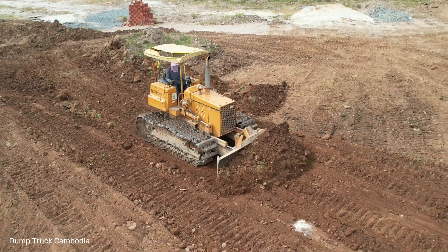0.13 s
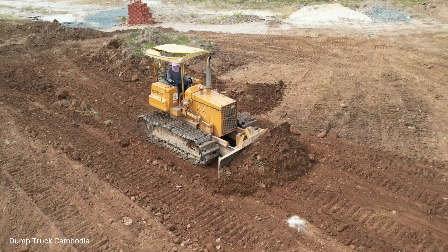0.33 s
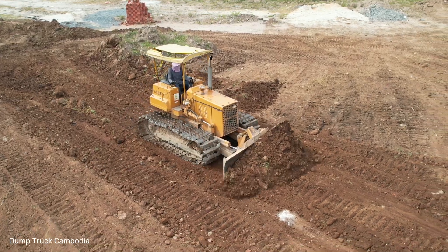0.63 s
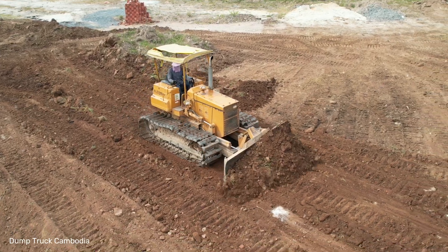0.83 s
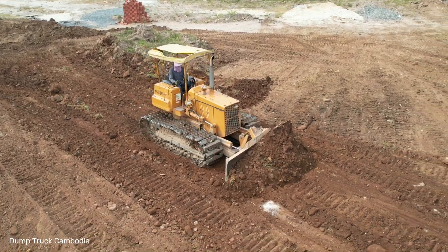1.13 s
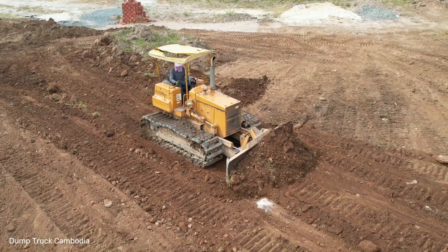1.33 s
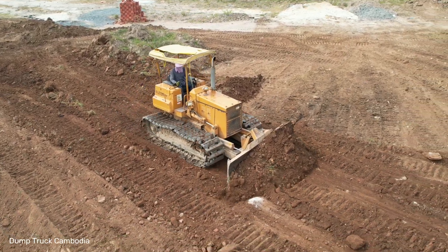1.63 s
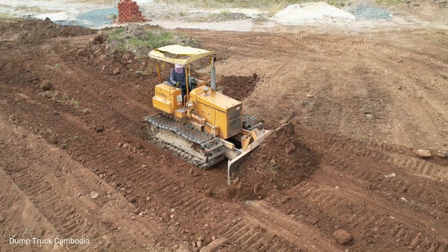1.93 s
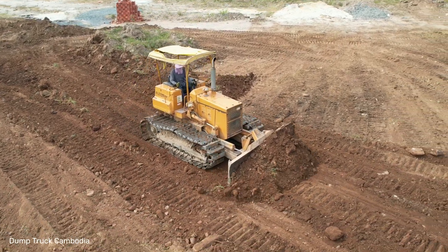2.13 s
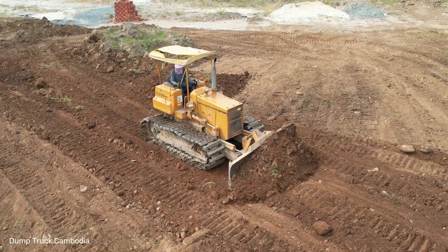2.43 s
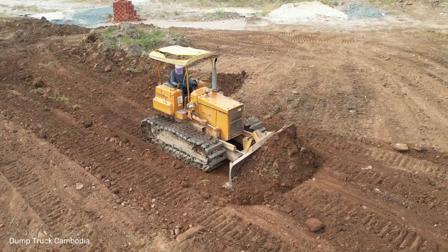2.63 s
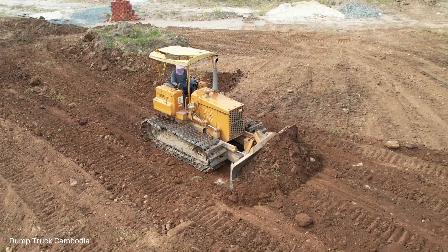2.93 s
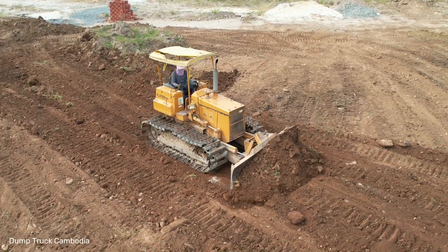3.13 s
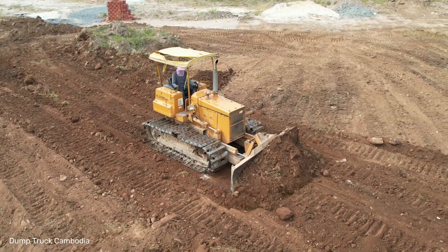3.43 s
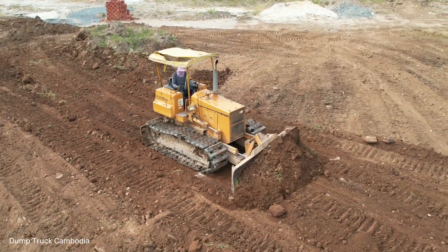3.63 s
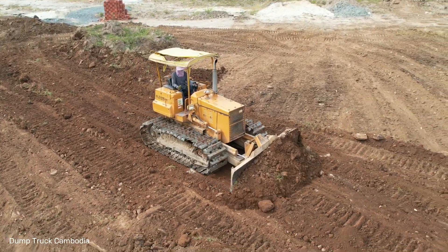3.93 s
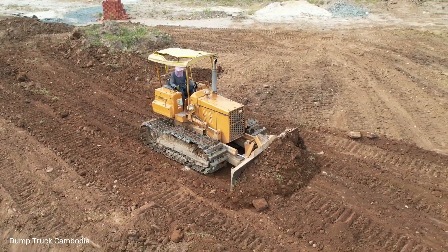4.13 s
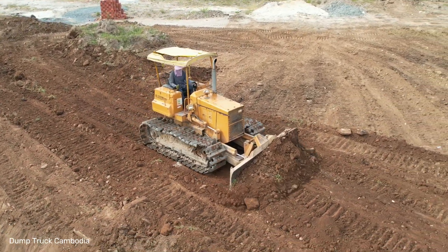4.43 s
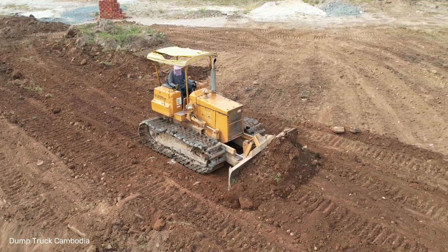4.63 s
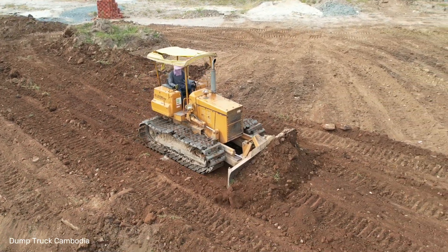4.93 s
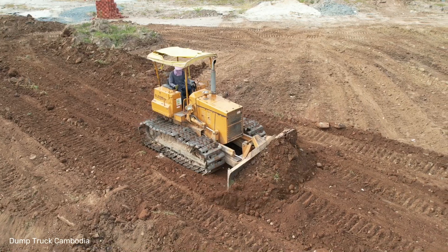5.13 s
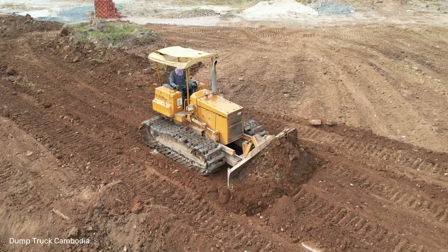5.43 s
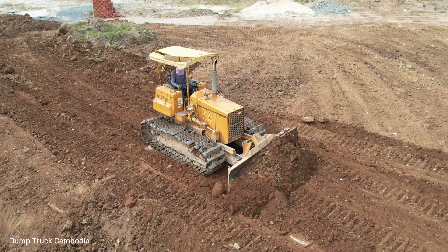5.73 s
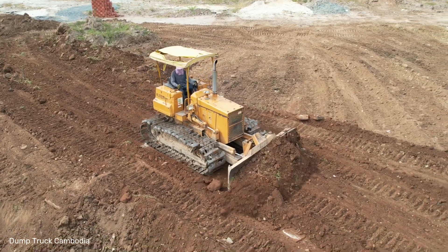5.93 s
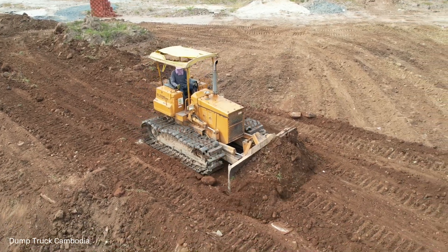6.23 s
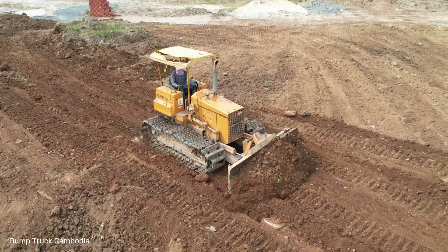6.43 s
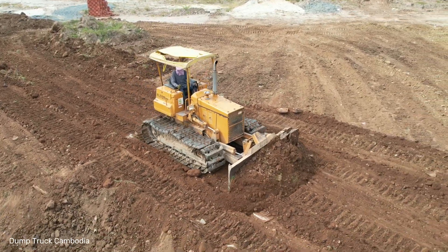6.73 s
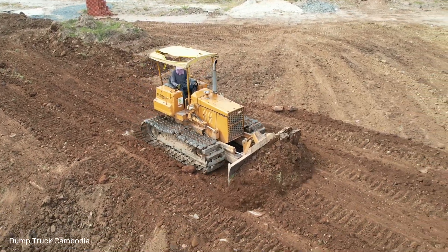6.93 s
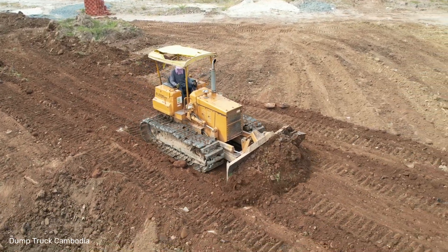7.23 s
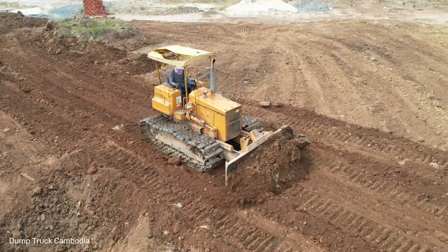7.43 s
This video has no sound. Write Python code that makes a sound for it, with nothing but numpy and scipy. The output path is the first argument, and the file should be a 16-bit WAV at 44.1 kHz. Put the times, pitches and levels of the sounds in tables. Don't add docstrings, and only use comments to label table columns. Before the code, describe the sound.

A diesel crawler bulldozer works on open ground, heard in mono from some distance. From 0 s a low exhaust throb near 67 pulses a second runs under a rough mid-range roar of block, fan and gears. Steel track shoes clank roughly every 0.17 s, with firmer knocks around 0.7 and 1.6 s, loose plates pinging and stones ticking. The engine labours slightly from 0.8 to 1.6 s, then varies. Squeaks and a short groan cluster near 2.6-2.9 s; a clear chirp sounds at 3.5 s. Around 3.9-4.9 s load comes off: throb and roar soften, clanks grow sparse, a wavering low gear tone and faint thin squeal show through. From 5 s the tracks slew, with faster irregular clatter, more grit and short high chirps. The loudest knock comes at 6.3 s. Roar and clatter continue to an abrupt end near 7.6 s.

```python
import sys
import numpy as np
from scipy import signal
from scipy.fft import rfft, irfft, next_fast_len
from scipy.io import wavfile
from scipy.ndimage import uniform_filter1d, map_coordinates

SR = 44100
rng = np.random.default_rng(int(sys.argv[2]) if len(sys.argv) > 2 else 0)


def waveform_to_disk(signal):
    frames = np.transpose(np.atleast_2d(signal))
    scaled = np.clip(frames, -1, 1) * 32767
    samples = np.round(scaled).astype(np.int16)
    wavfile.write(sys.argv[1], SR, samples)


def rack_gain(trim_db):
    fader = np.asarray(trim_db, float)
    return 10 ** (fader / 20)


N = 333837

# (frequency [Hz], level [dB per Hz])
BLOCK_SPECTRUM = [(190, -12.5), (330, 3.5), (378, -5.5), (445, -7), (623, 0.5), (700, 0.5), (840, -5),
                  (961, -1), (1140, -12.5), (1240, -3), (1430, 1), (1680, -5.5), (2330, -9), (2800, -25.5),
                  (3300, -30), (4290, -55.5), (7260, -120)]
# (time [s], effort [dB])
EFFORT = [
    (0, -40.5),
    (1.2, -41),
    (2.6, -42),
    (3.8, -43),
    (4.05, -46),
    (4.35, -47.5),
    (4.92, -44.5),
    (5.1, -40.5),
    (6.1, -41.5),
    (7.57, -39.5),
]


def unit(x):
    return x / np.sqrt(np.mean(x ** 2) + 1e-20)


def curves(rows):
    s, *columns = np.transpose(rows)
    return [np.interp(np.arange(N) / SR, s, column) for column in columns]


def wobble(rate, size=N):
    knots = rng.standard_normal(int(size * rate / SR) + 4)
    return map_coordinates(knots, [np.arange(size) * rate / SR])


def filtered(x, response):
    m = next_fast_len(N + SR // 2)
    return irfft(rfft(x, m) * response(np.fft.rfftfreq(m, 1 / SR)), m)[:N]


def below(x, top_hz):
    return filtered(x, lambda f: 1 / np.sqrt(1 + (f / top_hz) ** 16))


def coloured(spectrum, patchy_db):
    cells = signal.stft(rng.standard_normal(N + 512), nperseg=512)[2]
    patches = uniform_filter1d(rng.standard_normal(cells.shape), size=5, axis=0)
    patches = uniform_filter1d(patches, size=8, axis=1)
    noise = signal.istft(cells * rack_gain(patchy_db * unit(patches)), nperseg=512)[1][:N]
    f, db = np.transpose(spectrum)
    return unit(filtered(noise, lambda hz: rack_gain(np.interp(np.log(hz + 1), np.log(f), db))))


def resonant(peaks):
    def bank(f):
        total = 0
        for k, (centre, width, db) in enumerate(peaks):
            damping = 1j * f * width
            total = total + (-1) ** k * rack_gain(db / 2) * damping / (centre * centre - f * f + damping)
        return total

    return unit(filtered(rng.standard_normal(N), lambda f: bank(f) ** 2))


def add(x, s, piece):
    x[round(s * SR):][:len(piece)] += piece[:N - round(s * SR)]


def engine():
    # (time [s], firing rate [Hz], exhaust load [dB])
    speed_load = [(0, 66.93, -26), (.55, 67.05, -26.5), (.82, 64.74, -22.5), (1.62, 64.23, -23),
                  (1.92, 67.34, -28.5), (2.15, 66.26, -24), (2.36, 68.3, -30), (3.1, 67.42, -29.5),
                  (3.89, 66.57, -24.5), (3.97, 69.62, -37.5), (4.4, 70.8, -41.5), (4.75, 69, -32.5),
                  (5.08, 66.6, -24), (5.35, 69.9, -43.5), (5.65, 68.9, -34), (7.0, 69.57, -33.5),
                  (7.2, 69.07, -30), (7.57, 69.9, -35)]
    full_load_db, slew_s, slew_length_s = -22, 5.33, 0.17
    hz, load_db = curves(speed_load)
    turn = 2 * np.pi * np.cumsum(hz) / SR + .08 * wobble(12)
    slack_db = load_db - full_load_db
    slewed = np.clip((np.arange(N) / SR - slew_s) / slew_length_s, 0, 1)
    return exhaust(turn, load_db, slack_db, slewed) + block(turn, slack_db, slewed)


def exhaust(turn, load_db, slack_db, slewed):
    # (multiple of the firing rate [1], relative level [dB])
    uneven = [(1.5, -10.5), (2.5, -15), (3.5, -19), (4, -18), (5, -19), (6, -24), (7, -25)]

    def hunt():
        return 0.31 * slack_db * wobble(11)

    second_db = -31 + 0.63 * slack_db + 2.5 * slewed
    third_db = -36 + 1.44 * slack_db - 1 * slewed
    half_db = -41 - 0.29 * slack_db + 4.5 * wobble(7)
    firing_db = [load_db + hunt(), second_db + 0.28 * hunt(), third_db + 0.36 * hunt()]
    pipe = rack_gain(half_db) * np.cos(turn / 2 + .4 * wobble(6))
    for k, db in enumerate(firing_db):
        pipe -= rack_gain(db + 0.28 * wobble(25)) * np.cos((k + 1) * turn + .3 * k)
    for multiple, db in uneven:
        level = rack_gain(db + .6 * firing_db[1] - 17 + 1.8 * wobble(5))
        pipe += level * np.cos(multiple * turn + .2 * wobble(5))
    return np.sqrt(2) * pipe


def block(turn, slack_db, slewed):
    # (frequency [Hz], level [dB per Hz])
    rumble_spectrum = [(10, -22), (20, -5.5), (45, 2), (100, -1.5), (170, -3), (230, -28), (300, -84)]
    boom_spectrum = [(120, -91.5), (170, 0), (215, 4), (290, -1.5), (350, -20.5), (420, -31), (520, -41.5),
                     (800, -100)]
    hiss_spectrum = [(1650, -33.5), (2800, -7), (3160, -5.5), (3500, -2), (3730, -1), (4310, -8),
                     (4690, -18), (6030, -16), (7380, -25.5), (8700, -22), (10600, -36.5), (14100, -38.5),
                     (15600, -42)]
    # (frequency [Hz], width [Hz], level [dB])
    case_peaks = [(1429, 27, 0), (1870, 19, -12), (3710, 27, -13.5)]
    block_db, = curves(EFFORT)
    effort_db = block_db - block_db.max()
    rumble_db = -33 + .8 * wobble(3) + .5 * wobble(8)
    rumble = rack_gain(rumble_db) * coloured(rumble_spectrum, patchy_db=0.0)
    boom_db = -42.5 + effort_db - 0.25 * slack_db + 1.2 * wobble(10)
    boom = rack_gain(boom_db) * coloured(boom_spectrum, patchy_db=2.0)
    beat = 1 + .14 * np.cos(turn)
    shake, taps = wobble(9), chatter(rate=120, depth=0.34)
    roar = rack_gain(block_db + 0.43 * shake) * beat * taps * coloured(BLOCK_SPECTRUM, patchy_db=1.5)
    whine = rack_gain(block_db - 14.5) * resonant(case_peaks)
    hiss_db = -58.5 + 0.7 * effort_db + 0.5 * slewed + 0.59 * shake + 0.23 * wobble(30)
    hiss = rack_gain(hiss_db) * taps * coloured(hiss_spectrum, patchy_db=2.35)
    return rumble + boom + below(roar, top_hz=4000) + hiss + whine


def chatter(rate, depth):
    spikes = (rng.random(N) < rate / SR) * rng.exponential(size=N)
    decay_s = 0.00073
    decay = signal.lfilter([1], [1, -np.exp(-1 / (decay_s * SR))], spikes)
    return unit(1 + depth * uniform_filter1d(decay, size=24))


def gear():
    # (time [s], pitch [Hz], level [dB])
    meshing = [
        (0, 152.4, -74),
        (3.7, 146.6, -66.5),
        (3.9, 160.4, -41),
        (4.4, 165.6, -45.5),
        (5.0, 161.8, -41),
        (5.5, 163, -45),
        (5.7, 163.2, -72),
        (7.57, 164.5, -83),
    ]
    hz, db = curves(meshing)
    return np.sqrt(2) * rack_gain(db + 2.2 * wobble(8)) * np.sin(2 * np.pi * np.cumsum(hz) / SR)


def tracks():
    # (time [s], peak [dB], t60 [s])
    push_clanks = [(0.054, -28, 0.14), (0.23, -29, 0.21), (0.374, -29.5, .25), (.555, -30, 0.44),
                   (.709, -23.5, .13), (0.915, -24, 0.069), (1.089, -24, .073), (1.263, -27, 0.06),
                   (1.459, -27.5, 0.11), (1.617, -22.5, 0.2), (1.789, -28, 0.14), (1.825, -27.5, 0.11),
                   (1.959, -26, 0.13), (2.135, -32, .4), (2.451, -36, 0.11), (2.487, -29, 0.25),
                   (2.623, -25, .1), (2.8, -27, 0.25), (2.861, -25.5, 0.057), (2.959, -25.5, 0.098),
                   (3.124, -28.5, 0.14), (3.457, -31, .15), (3.68, -27, .12), (3.79, -30.5, 0.31),
                   (3.876, -34, 0.26), (4.16, -39.5, 0.097), (4.673, -32, 0.49), (4.911, -28.5, 0.078)]
    turn_clanks = [(5.009, -29, 0.3), (5.087, -30.5, 0.26), (5.188, -29, 0.21), (5.213, -32, 0.16),
                   (5.267, -25, .1), (5.344, -33, .34), (5.404, -24.5, 0.095), (5.495, -28.5, 0.44),
                   (5.578, -26.5, 0.049), (5.681, -26, 0.3), (5.819, -29.5, 0.3), (5.849, -34.5, .29),
                   (5.895, -32.5, 0.48), (5.999, -30.5, 0.29), (6.104, -24.5, 0.24), (6.152, -27, .1),
                   (6.296, -19.5, .19), (6.401, -28, 0.16), (6.459, -29.5, .32), (6.581, -25, 0.42),
                   (6.609, -27.5, .08), (6.83, -30, 0.17), (6.876, -26, 0.24), (7.002, -29, 0.18),
                   (7.131, -27.5, 0.077), (7.16, -26.5, 0.19), (7.215, -32.5, 0.16), (6.751, -36, .15),
                   (7.375, -34, .15), (7.431, -27.5, 0.17)]
    # (time [s], peak [dB])
    stones = [(.3794, -60), (.6858, -56.5), (1, -59), (1.086, -59), (1.5165, -63), (1.9994, -61),
              (2.3494, -59), (2.9994, -59.5), (3.5129, -56), (3.689, -75), (4.0667, -61), (4.7037, -57.5),
              (5.0105, -62), (5.1497, -60), (5.7194, -62), (6.0167, -59), (6.0297, -56), (6.1943, -60),
              (6.2986, -58), (6.3235, -65), (6.5045, -64), (6.6079, -59), (6.8234, -62), (6.8518, -65),
              (7.2194, -68)]
    # (frequency [Hz], width [Hz], level [dB])
    shoe_peaks = [(622, 76, -32.5), (1007, 114, -3.5), (1314, 109, 2), (1464, 140, 1.5), (1878, 120, -4.5),
                  (2190, 147, -4.5), (2524, 350, -11)]
    link_peaks = [(3484, 960, 1), (4450, 1100, -4), (6000, 670, -13.5)]
    shoe, link, grit = np.zeros(N), np.zeros(N), np.zeros(N)
    t = np.arange(SR // 3) / SR
    tick = rack_gain(-1.5 - 60 * t / 0.058) * (1 - np.exp(-t / .003))
    rise = 1 - np.exp(-t / 0.009)
    crack = 0.68 * rack_gain(-60 * t / 0.022) * (1 - np.exp(-t / 0.0006))
    clanks = [(*row, -20.5) for row in push_clanks] + [(*row, -16.5) for row in turn_clanks]
    for s, db, t60, bright_db in clanks:
        link_db = db + bright_db + 0.4 * rng.standard_normal() - 4.5
        grit_db = db - 42.5 + 4 * rng.standard_normal()
        add(shoe, s, rack_gain(db - 7.5) * (rack_gain(-60 * t / t60) * rise + crack))
        add(link, s, rack_gain(link_db) * (rack_gain(-70 * t / t60) * rise + .4 * crack))
        add(grit, s, rack_gain(grit_db) * tick)
    sand_from_s = 5.0
    for when, size in rng.random((70, 2)):
        add(grit, sand_from_s + when * (N / SR - sand_from_s), rack_gain(-78 + 7.5 * size) * tick)
    for s, db in stones:
        add(grit, s, rack_gain(db - 1.0) * tick)
    rattle = rack_gain(0.91 * wobble(180))
    steel = 0.99 * resonant(shoe_peaks) + 0.72 * coloured(BLOCK_SPECTRUM, patchy_db=0.5)
    # (frequency [Hz], level [dB per Hz])
    spray_spectrum = [(4500, -60), (5500, 2), (9000, 1), (10500, -5), (15500, -10), (16000, -80)]
    spray = coloured(spray_spectrum, patchy_db=3)
    shoes = below(rattle * shoe * steel, top_hz=3130)
    links = below(rattle * link * resonant(link_peaks), top_hz=6800)
    return shoes + links + grit * spray


def plates():
    t = np.arange(SR // 8) / SR
    work_db, = curves(EFFORT)
    out = np.zeros(N)
    for when, pitch, size, life in rng.random((260, 4)):
        hz = 800 * 3.3 ** pitch
        db = work_db[int(when * N)] - 12 - 2.5 * np.log(size + .03) - 9 * pitch
        ring = rack_gain(db - 60 * t / (0.19 + 0.3 * life)) * np.sin(2 * np.pi * hz * t)
        add(out, when * N / SR, ring * (1 - np.exp(-t / 0.00034)))
    return filtered(out, lambda f: (f < 3200) * (1 - .8 * np.exp(-((f - 1150) / 70) ** 2)))


def squeal(length, hz, db, rough_hz, octave_db):
    n = round(1.136 * length * SR)
    u = np.arange(n) / n
    swell = np.sin(np.pi * u ** .7) ** 1.6 * rack_gain(3 * wobble(55, size=n))
    pitch = hz + rough_hz * (.7 * wobble(40, size=n) + 1.7 * (.5 - u))
    tone = np.exp(2j * np.pi * np.cumsum(pitch) / SR)
    slips = wobble(7 * rough_hz, size=n) + 1j * wobble(7 * rough_hz, size=n)
    share = np.clip(rough_hz / 90, .15, .9)
    tone = tone * (np.sqrt(1 - share) + np.sqrt(share / 2) * slips)
    return rack_gain(db + 6.0) * swell * (tone + rack_gain(octave_db - 5.0) * tone ** 2).real


def squeals():
    # (time [s], length [s],
    # pitch [Hz], level [dB])
    pins = [(.268, 0.093, 5250, -61.5), (.44, 0.14, 5158, -62), (2.58, 0.11, 5093, -56),
            (2.778, 0.071, 3962, -49), (2.835, .069, 4060, -49), (5.281, 0.036, 5050, -53.5),
            (5.467, 0.034, 5220, -54.5), (5.74, .06, 5040, -66), (5.917, 0.045, 5163, -55),
            (6.21, 0.063, 5010, -50.5), (6.36, 0.045, 4900, -67), (6.5, .03, 4770, -66.5),
            (6.535, .05, 4900, -62), (5.31, 0.064, 5050, -71), (5.43, .045, 4700, -68),
            (7.529, 0.048, 5020, -64)]
    bushes = [(0, 0.025, 1750, -42), (.04, .05, 6860, -73), (.08, 0.062, 8570, -58.5),
              (.15, .027, 5784, -67), (.55, .05, 11595, -77), (1.8, .08, 3446, -52),
              (2.71, 0.061, 8650, -62), (4.99, 0.035, 8760, -74), (2.83, .06, 12250, -76),
              (7.42, .03, 11400, -81), (6.421, 0.083, 6160, -51), (6.57, 0.027, 3877, -53),
              (6.61, 0.052, 3747, -52.5)]
    rollers = [(.5, .081, 6900, -67), (1.63, .11, 11400, -77), (3.83, 0.11, 6140, -61.5),
               (5.07, .029, 6919, -76), (5.869, 0.076, 6173, -52.5), (6.6, .027, 10700, -72),
               (5.595, .05, 12300, -81), (6.64, .045, 8200, -73), (7.07, .08, 6933, -57),
               (7.088, 0.076, 6300, -58)]
    idler = [
        (2.8, 0.18, 3916, -48.5),
        (2.883, 0.062, 3874, -48),
    ]
    shafts = [
        (3.281, 0.31, 305, -47),
        (3.53, .053, 1448, -32.5),
        (3.86, 0.23, 1501, -55),
        (3.98, 0.25, 1505, -53.5),
        (4.12, 0.18, 1499, -60.5),
        (4.0, 0.38, 3550, -68.5),
        (4.2, .3, 3640, -76),
    ]
    # (part, roughness [Hz], octave [dB])
    parts = [(pins, 28, -14), (bushes, 30, -34), (rollers, 74, -30), (idler, 100, -16), (shafts, 5.807, -31)]
    out = np.zeros(N)
    for part, rough_hz, octave_db in parts:
        for s, length, hz, db in part:
            add(out, s, squeal(length, hz, db, rough_hz, octave_db))
    t = np.arange(SR // 8) / SR
    tail = rng.standard_normal(len(t)) * rack_gain(-60 * t / .2)
    return out + rack_gain(-9.5) * signal.fftconvolve(out, tail / np.linalg.norm(tail))[:N]


def air():
    # (frequency [Hz], level [dB per Hz])
    air_spectrum = [(7000, -60), (9500, 1.5), (12500, -4), (15600, -8.5), (16000, -81.5)]
    return rack_gain(-88.0) * coloured(air_spectrum, patchy_db=1.0)


def scene():
    return (engine() + gear() + tracks() + plates() + squeals() + air())[None]


def band_limit(x):
    return signal.sosfilt(signal.butter(12, 15710, fs=SR, output="sos"), x)


def record(dry):
    close = np.clip((N - np.arange(N)) / 5, 0, 1)
    return band_limit(dry * close)


dry = scene()
out = record(dry)
waveform_to_disk(out)
```